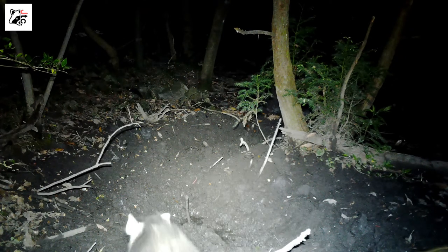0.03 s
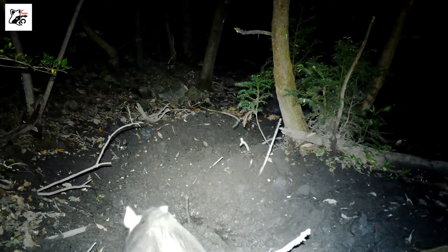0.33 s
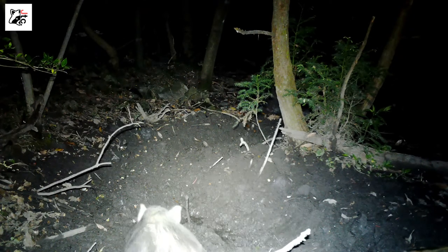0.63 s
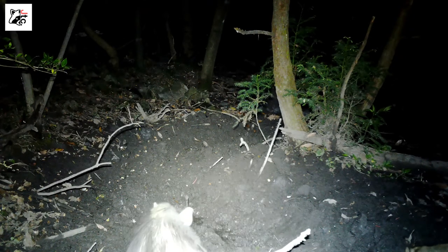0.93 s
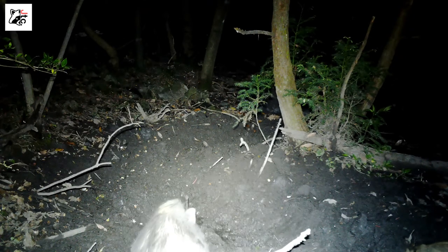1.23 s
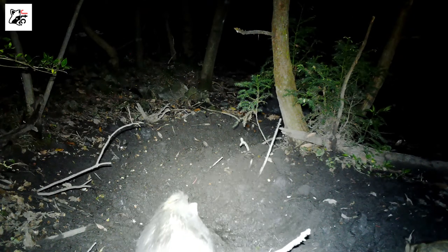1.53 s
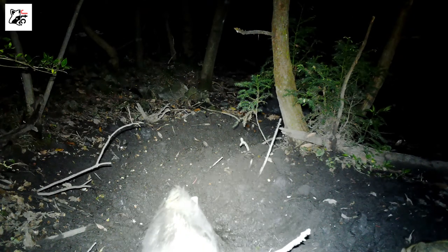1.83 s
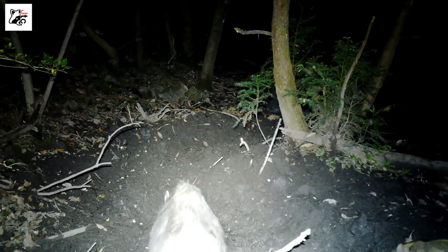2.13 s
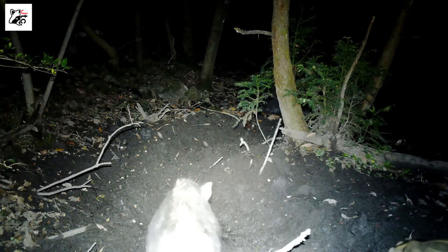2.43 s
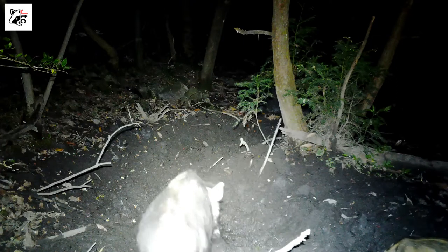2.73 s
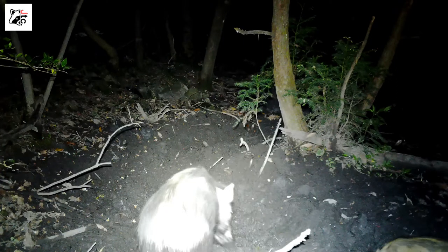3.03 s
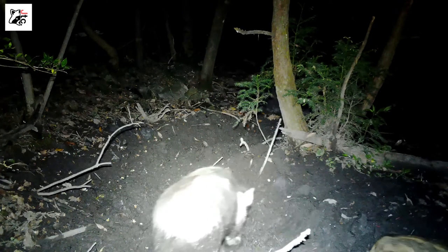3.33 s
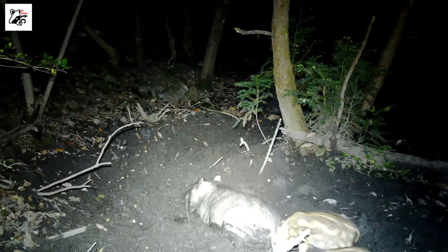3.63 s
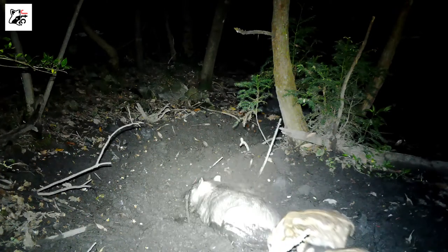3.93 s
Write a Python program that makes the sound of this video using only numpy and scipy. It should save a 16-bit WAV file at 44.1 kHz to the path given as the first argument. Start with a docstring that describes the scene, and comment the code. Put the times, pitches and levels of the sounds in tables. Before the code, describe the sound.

A wild boar roots through wet mud, crackling and squelching, as insects buzz faintly.

```python
"""Wild boar in a forest wallow at night

A boar treads and roots a few metres away: hooves thud, mud churns and squelches, wet pockets pop,
leaf litter crackles and twigs snap. Insects buzz near 7 kHz over the hush of the night air.
The sound drops out for an instant near 3.6 s; then slow glottal pulses give one low grunt."""
import sys
import numpy as np
from scipy import signal
from scipy.fft import rfft, irfft, next_fast_len
from scipy.io import wavfile
from scipy.ndimage import uniform_filter1d

SR = 44100
rng = np.random.default_rng(int(sys.argv[2]) if len(sys.argv) > 2 else 0)


def to_wav(sig):
    """Store sig (one row per channel, or 1-D mono) as 16-bit WAV at the path in sys.argv[1].

    Samples outside -1..1 are clipped; the rate is SR.
    """
    pcm = np.clip(np.atleast_2d(sig), -1, 1) * 32767
    pcm = np.round(pcm).astype(np.int16)
    wavfile.write(sys.argv[1], SR, pcm.T)  # frames by channels


N = 176400
T = np.arange(N) / SR
DROPOUT_START_S, DROPOUT_END_S = 3.617, 3.651
CUTOFF_HZ = 14350
SPLINTER_DECAY_S = .0035


def from_db(db):
    """Decibels to gain."""
    return 10 ** (np.asarray(db) / 20)


def unit_rms(x):
    """Scale to rms 1."""
    return x / np.sqrt(np.mean(x ** 2) + 1e-20)


def burst(x, length_s=.01):
    """Scale to the energy of rms 1 held for length_s."""
    return x * np.sqrt(length_s * SR / (np.sum(x ** 2) + 1e-20))


def add(out, start_s, x):
    """Mix x into out from start_s on."""
    i = int(np.clip(start_s * SR, 0, N - 1))
    out[i:i + len(x)] += x[:N - i]


def curves(rows):
    """Interpolate rows of (t/s, values...) to one curve per value."""
    times_s, *columns = np.transpose(rows)
    return [np.interp(T, times_s, column) for column in columns]


def colour(x, spectrum):
    """Minimum-phase filter from rows of (f/Hz, gain/dB)."""
    size = 2 * next_fast_len(len(x))
    hz, db = np.transpose(spectrum)
    gain_db = np.interp(np.log(np.fft.rfftfreq(size, 1 / SR) + 1), np.log(hz), db)
    cepstrum = irfft(np.log(from_db(gain_db)))
    cepstrum[1:size // 2] *= 2
    cepstrum[size // 2 + 1:] = 0
    return irfft(rfft(x, size) * np.exp(rfft(cepstrum)))[:len(x)]


def resonate(x, hz, width_hz):
    """Two-pole resonance, peak gain 1."""
    r = np.exp(-np.pi * width_hz / SR)
    zeros = np.array([1, 0, -1]) * (1 - r * r) / 2
    poles = [1, -2 * r * np.cos(2 * np.pi * hz / SR), r * r]
    return signal.lfilter(zeros, poles, x + 1e-18)


def glide(x, hz, width_hz):
    """Resonance whose centre follows the curve hz."""
    r = np.exp(-np.pi * width_hz / SR)
    phasor = np.exp(2j * np.pi * np.cumsum(hz) / SR)
    return 2 * np.real(phasor * signal.lfilter([1 - r], [1, -r], x / phasor + 1e-18))


def clicks(per_s, spread_db, size):
    """Random clicks, many small and a few large."""
    heights = from_db(spread_db * np.minimum(rng.exponential(1, size), 4.5))
    signs = rng.choice([-1, 1], size)
    return heights * signs * (rng.random(size) < per_s / SR)


def crackle(levels, spectrum, per_s, spread_db, t60_cycles, count=24, clump_db=3, clump_s=.025):
    """Clumped grains, each ringing one of count short resonances, under a level curve."""
    grains = clicks(per_s, spread_db, N)
    pitch_index = rng.integers(0, count, N)
    knots_s = np.arange(0, T[-1] + clump_s, clump_s)
    grains *= from_db(clump_db * np.interp(T, knots_s, rng.standard_normal(N)[:len(knots_s)]))
    pitches_hz = np.geomspace(spectrum[0][0], spectrum[-1][0], count)
    q = np.pi * t60_cycles / np.log(1000)
    rings = sum(resonate(grains * (pitch_index == k), hz, hz / q) for k, hz in enumerate(pitches_hz))
    return from_db(curves(levels)[0]) * unit_rms(colour(rings, spectrum))


def night_air():
    """Steady hush, strongest in the bass."""
    # air noise spectrum: f/Hz, gain/dB
    spectrum = [(20, 4.5), (40, -3), (80, -6.5), (160, -11), (320, -15.5), (700, -22), (1500, -24),
                (3000, -26.5), (6000, -29), (10000, -28.5), (14500, -27)]
    return from_db(-51) * unit_rms(colour(rng.standard_normal(N), spectrum))


def insects(wingbeat_hz=42, throb_depth=.063):
    """Far insects merge into one band; near ones, blurred by trees, throb with their wingbeat."""
    # near insects: carrier f/Hz, line width/Hz, level/dB
    carriers = [(6780, 94, -55.5), (6850, 40, -54.5), (6983, 56, -57.5), (7050, 45, -60), (7150, 26, -57.5),
                (7240, 34, -55.5)]

    def band(hz, width_hz):
        return unit_rms(resonate(resonate(rng.standard_normal(N), hz, width_hz), hz, width_hz))

    out = from_db(-50.5) * band(hz=6927, width_hz=500)
    for hz, width_hz, db in carriers:
        beats = wingbeat_hz * rng.uniform(.96, 1) * T + rng.random()
        throb = 1 + throb_depth * np.sin(2 * np.pi * beats)
        out += from_db(db) * band(hz, width_hz) * throb
    return out


def mud():
    """Churned mud gives a dense, wet crackle."""
    # churning: t/s, relative level/dB
    levels = [(0, -53.5), (.12, -51.5), (.22, -60), (.29, -56.5), (.34, -52), (.52, -52), (.65, -67),
              (.78, -52), (1.1, -50), (1.28, -52), (1.5, -53), (1.7, -47.5), (1.9, -57.5), (2.07, -58.5),
              (2.2, -50.5), (2.53, -50.5), (2.76, -55.5), (2.92, -56), (3.05, -51), (3.25, -55),
              (3.42, -50), (3.6, -47.5), (3.68, -52), (3.76, -51.5), (3.86, -47.5), (4, -56)]
    # mud spectrum: f/Hz, gain/dB
    spectrum = [(500, -5.5), (900, -3.5), (1600, 3), (2600, -0.5), (4000, 1), (6000, -1), (8000, 0)]
    return from_db(-4) * crackle(levels, spectrum, per_s=1000, spread_db=2.5, t60_cycles=9.5)


def leaf_litter():
    """Stirred leaves give a fine, bright crackle."""
    # stirring: t/s, relative level/dB
    levels = [(0, -49), (.26, -63), (.35, -52.5), (.5, -59), (.62, -59), (.76, -54.5), (1.09, -54.5),
              (1.3, -57), (1.42, -53.5), (1.53, -55.5), (1.8, -54), (2.01, -66), (2.15, -43), (2.25, -64),
              (2.45, -52), (2.7, -53.5), (2.9, -53.5), (3.03, -54), (3.22, -56), (3.33, -52.5), (3.69, -56),
              (3.81, -55), (4, -59)]
    # leaf spectrum: f/Hz, gain/dB
    spectrum = [(4000, -2), (6000, -0.5), (8500, 6.5), (10500, 5.5), (12500, -2), (15000, -6)]
    return from_db(-3) * crackle(levels, spectrum, per_s=760, spread_db=1.5, t60_cycles=9)


def thuds(shove=28):
    """A hoof shoves once into soft ground and the soil crumbles."""
    # footfalls: t/s, level/dB, decay/s, corner f/Hz
    steps = [(.06, -51.5, 0.017, 274), (.34, -53, 0.033, 95.5), (1.022, -47, 0.0053, 370),
             (1.026, -47, 0.077, 112), (1.33, -55, 0.042, 141), (2.1329, -43, 0.0076, 234),
             (2.165, -60.5, 0.11, 453), (2.9765, -42.5, 0.007, 213.5)]
    out, t = np.zeros(N), T[:SR // 3]
    for start_s, db, decay_s, hz in steps:
        ground = [(hz / 5, -14), (hz / 2, 0), (hz * 1.16, 0),
                  (hz * 1.13, -11), (hz * 4.4, -17), (hz * 8, -36)]
        crumble = rng.standard_normal(len(t)) * np.exp(-t / decay_s)
        thud = colour(shove * (t == 0) + crumble, ground)
        add(out, start_s, from_db(db) * burst(thud, decay_s))
    return out


def snaps(rise_s=.00076, decay_s=.0005, patchy_db=4, push_s=.002, pop_q=13, mud_damping_hz=75):
    """Mud pockets and bits of litter burst: a splintering crack and a pop that rings a few cycles."""
    # bursts: t/s, crack level/dB, pop f/Hz, pop level/dB
    breaks = [(0.067, -39.5, 1650, -47), (0.185, -52, 2060, -47), (0.347, -44, 3000, -68),
              (0.445, -44.5, 1520, -48), (.450, -45, 2700, -72), (0.465, -38, 2320, -44),
              (.540, -46, 3850, -50), (.581, -44.5, 3560, -58), (0.735, -43.5, 1240, -49.5),
              (0.75, -54, 3440, -44.5), (0.782, -55, 3200, -55), (0.861, -47.5, 2250, -52.5),
              (0.926, -62, 1580, -56), (0.985, -47, 1330, -53), (1.074, -46.5, 2850, -48),
              (1.103, -44, 2510, -48), (1.129, -60, 1600, -59), (1.152, -64, 1510, -50.5),
              (1.178, -58, 1700, -52), (1.197, -42.5, 5220, -40.5), (1.226, -50, 1330, -52.5),
              (1.244, -49.5, 1500, -55), (1.355, -68, 5700, -48), (1.385, -55, 7400, -44),
              (1.401, -64, 9450, -58), (1.459, -45, 3470, -54), (1.727, -49, 8900, -51),
              (1.826, -44, 2110, -45), (1.8265, -52, 4070, -46.5), (1.969, -46, 1250, -51),
              (1.992, -50, 1460, -55.5), (2.040, -58, 9000, -52.5), (2.113, -50, 3900, -45),
              (2.120, -44, 7500, -54), (2.131, -36.5, 5400, -41), (2.170, -53, 1320, -48.5),
              (2.229, -60, 8600, -56), (2.247, -45, 1770, -49), (2.278, -45, 2930, -54),
              (2.387, -41, 2180, -47), (2.451, -44.5, 1690, -46), (2.483, -42.5, 4540, -58),
              (2.603, -64, 8950, -53), (2.612, -65, 9750, -50), (2.621, -48, 6130, -51),
              (2.658, -45.5, 8000, -65), (2.724, -45, 3840, -56), (2.782, -57, 8950, -52),
              (2.824, -45, 3650, -53), (2.878, -54, 2330, -54), (2.954, -47, 1800, -59),
              (3.0192, -43, 4400, -43), (3.072, -48.5, 1470, -50), (3.304, -50.5, 7160, -45.5),
              (3.346, -46, 2950, -50), (3.492, -56, 1590, -45.5), (3.609, -50, 7550, -49),
              (3.729, -39, 3760, -51), (3.828, -39.5, 3870, -46), (3.8325, -37.5, 4640, -44.5),
              (3.8614, -54, 2700, -51), (3.880, -50, 3000, -53), (3.924, -44, 1960, -51.5),
              (3.939, -55, 2700, -48.5), (3.9939, -41.5, 2960, -48)]
    # mean crack spectrum: f/Hz, gain/dB
    crack_spectrum = [(300, -13), (900, -7.5), (1800, -3.5), (5000, 2.5), (9000, 1), (12000, -8),
                      (15000, 1)]
    out, t = np.zeros(N), T[:SR // 20]
    spike = t == 0
    rise = 1 - np.exp(-t / rise_s)  # fibres give way one after another
    breaking = rise * (np.exp(-t / decay_s) + from_db(-13) * np.exp(-t / SPLINTER_DECAY_S))
    for start_s, crack_db, hz, pop_db in breaks:
        crack_noise, push_noise = rng.standard_normal((2, len(t)))
        spectrum = [(f, db + patchy_db * rng.standard_normal()) for f, db in crack_spectrum]
        crack = colour(1.04 * spike + crack_noise * breaking, spectrum)
        push = spike + .18 * push_noise * np.exp(-t / push_s)
        ring = resonate(push, hz, hz / pop_q + mud_damping_hz)
        pop = resonate(ring, hz, hz * .81)
        add(out, start_s, from_db(crack_db) * burst(crack) + from_db(pop_db) * burst(pop))
    return out


def squelches(count=12, cells_per_s=3000, spread_db=3.5, q=2.35):
    """Hoof or snout squeezes the mud: a swarm of tiny wet cells bursts, swelling and fading."""
    # squeezes: t/s, length/s, level/dB, centre f/Hz
    squeezes = [(0.31, 0.057, -51, 3700), (0.44, 0.037, -55, 3440), (0.68, 0.013, -52, 4630),
                (0.727, 0.087, -55, 4440), (0.839, 0.064, -54, 8600), (1.01, 0.043, -51.5, 2880),
                (1.059, 0.05, -49.5, 3220), (1.143, 0.16, -66, 2150), (1.589, 0.028, -41.5, 4360),
                (1.661, 0.041, -54, 3100), (1.811, 0.022, -48.5, 4200), (2.15, 0.036, -45.5, 2340),
                (2.153, 0.017, -50, 9000), (2.419, 0.063, -50, 2930), (2.503, 0.039, -51, 2550),
                (2.814, 0.052, -52, 9100), (2.98, 0.069, -52.5, 2580), (3.011, 0.017, -43.5, 4300),
                (3.407, 0.069, -48.5, 4340), (3.772, 0.046, -49.5, 5350), (3.816, 0.02, -44, 4400),
                (3.876, 0.034, -51, 2930)]
    out, t = np.zeros(N), T[:SR // 4]
    octaves = .72 * np.linspace(-1.5, 1, count)
    for start_s, length_s, db, centre_hz in squeezes:
        swell = np.sqrt(np.abs(np.sin(np.pi * t / length_s))) * (t < length_s)
        cells = np.zeros(len(t))
        for hz in np.minimum(centre_hz * 2 ** octaves, CUTOFF_HZ):
            grains = clicks(cells_per_s / count, spread_db, len(t)) * swell
            cells += resonate(grains, hz, hz / q) / np.sqrt(hz)
        add(out, start_s, from_db(db) * burst(cells, length_s))
    return out


def twigs(fracture=4.8, edge_db=-13):
    """A dry twig gives one sharp fracture and a short tear; thicker wood sounds in a lower band."""
    # twig breaks: t/s, level/dB, lower f/Hz, upper f/Hz, decay/s
    breaks = [(.491, -49, 6000, 9550, .0003), (1.592, -39.5, 4800, 12500, .0005),
              (1.594, -36.5, 3020, 10500, 0.0011), (2.1297, -35, 5100, 8700, .0014),
              (2.152, -41.5, 2450, 5200, 0.00058), (2.315, -45, 7300, 9500, .0004),
              (2.333, -44.5, 5450, 9900, 0.00026), (2.8197, -40.5, 3270, 5250, 0.0012),
              (2.964, -46, 1200, 5800, 0.00017), (2.976, -39, 1060, 2330, 0.0045),
              (2.978, -45, 7500, 10300, .001), (2.9826, -40, 6500, 11200, .0011),
              (3.0017, -43.5, 6400, 9100, 0.00054), (3.0266, -45, 2600, 8000, .001),
              (3.19, -53, 6500, 9500, .0003)]
    out, t = np.zeros(N), T[:SR // 20]
    splinter = from_db(-12) * np.exp(-t / SPLINTER_DECAY_S)
    for start_s, db, low_hz, high_hz, decay_s in breaks:
        tear = rng.standard_normal(len(t)) * (np.exp(-t / decay_s) + splinter)
        wood = [(low_hz / 5, -26), (low_hz * .7, edge_db), (low_hz, 0),
                (high_hz, 0), (high_hz * 1.2, edge_db), (high_hz * 4, -21)]
        crack = colour(fracture * (t == 0) + tear, wood)
        add(out, start_s, from_db(db) * burst(crack))
    return out


def grunt(lead_s=.00812, fade_s=.008, jitter=.008, shimmer=.13, rasp=.008):
    """Slow, uneven glottal pulses ring the throat; its three lowest resonances fade first."""
    # grunt contour: t/s, pulse f/Hz, relative level/dB
    contour = [(3.654, 60.14, -44), (3.687, 61.06, -39), (3.729, 61.43, -41), (3.776, 55.8, -44),
               (3.807, 55, -49.5), (3.825, 56, -68)]
    # throat resonances: f/Hz, width/Hz, gain/dB
    throat = [(123, 43, 1), (188, 70, -.5), (255, 44, 1), (298, 53, -.5), (369, 35, 2), (423, 27, 3),
              (638, 42, -8)]
    chest_fade_start_s, chest_loss_db_per_s = 3.73, 124
    pulse_hz, level_db = curves(contour)
    voiced = T > DROPOUT_END_S - lead_s  # under way when the sound returns
    wobble = unit_rms(uniform_filter1d(rng.standard_normal(N), SR // 60))
    cycles = np.cumsum(pulse_hz * (1 + jitter * wobble) * voiced) / SR
    pulses = -np.diff(np.ceil(cycles), prepend=0) * (1 + shimmer * rng.standard_normal(N))
    pulses += rasp * rng.standard_normal(N) * voiced  # turbulence between pulses
    chest = from_db(-chest_loss_db_per_s * np.maximum(T - chest_fade_start_s, 0))
    sag = (pulse_hz / pulse_hz.max()) ** .78  # resonances sink with the pitch as the grunt relaxes
    voice = np.zeros(N)
    for k, (hz, width_hz, db) in enumerate(throat):
        ring = (-1) ** k * from_db(db) * glide(pulses, hz * sag, width_hz)
        voice += ring * (chest if k < 3 else 1)
    voice = signal.sosfilt(signal.butter(3, [90, 620], "band", fs=SR, output="sos"), voice)
    voice /= np.sqrt(np.abs(uniform_filter1d(voice ** 2, SR // 30)) + 1e-14)  # running rms 1
    end_s = contour[-1][0]
    fade = np.clip((end_s + fade_s - T) / fade_s, 0, 1)
    return voice * from_db(level_db - 3.5) * fade


def forest(x, t60_s=.2):
    """Trunks scatter a thin, short tail."""
    t = T[:SR // 2]
    echoes = clicks(per_s=3000, spread_db=3.6, size=len(t)) * from_db(-60 * t / t60_s)
    tail = colour(echoes, [(200, 3), (2000, -6), (6000, 2.5), (14000, -8.5)])
    return signal.fftconvolve(x, burst(tail, 1 / SR))[:N]


def scene():
    """Boar, forest tail, insects and night air, in mono."""
    # treble loss through air and undergrowth: f/Hz, gain/dB
    distance = [(8000, 0), (10500, 0), (12500, -2), (14500, -5.5)]
    boar = mud() + leaf_litter() + twigs() + snaps() + squelches() + thuds() + grunt()
    boar = colour(boar, distance)
    return (night_air() + boar + from_db(-14.5) * forest(boar) + insects())[None]


def record(dry):
    """Brief dropout, then a steep low-pass."""
    audible = (T < DROPOUT_START_S) | (T > DROPOUT_END_S)
    lowpass = signal.ellip(10, .2, 70, CUTOFF_HZ, fs=SR, output="sos")
    return signal.sosfilt(lowpass, dry * audible + 1e-18)


dry = scene()
out = record(dry)
to_wav(out)
```